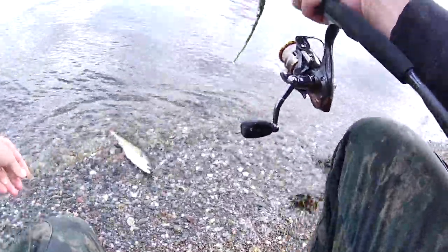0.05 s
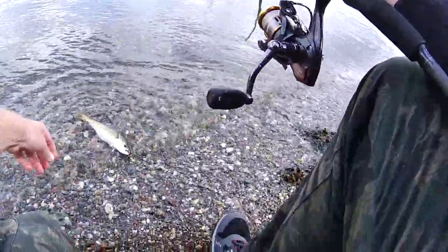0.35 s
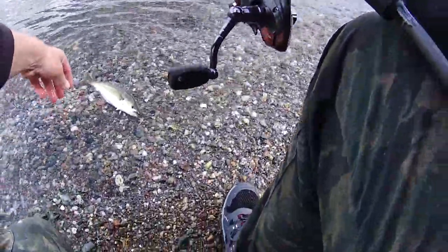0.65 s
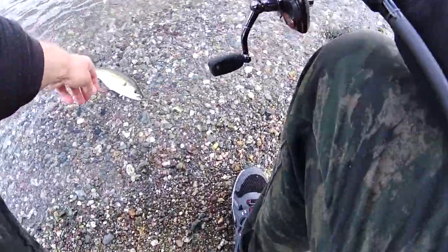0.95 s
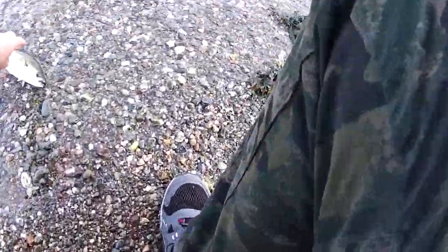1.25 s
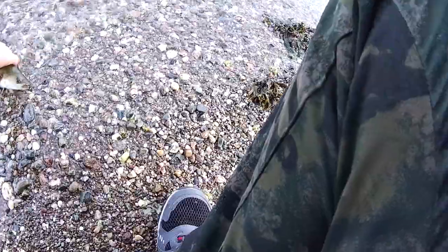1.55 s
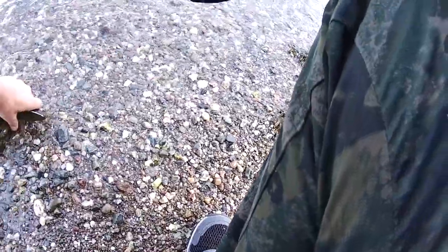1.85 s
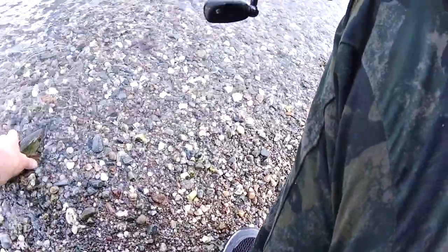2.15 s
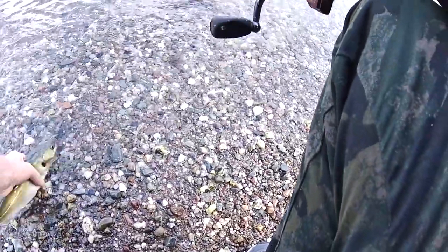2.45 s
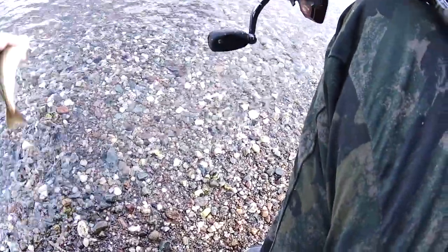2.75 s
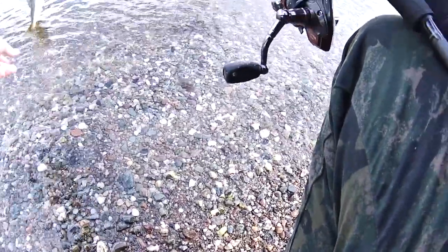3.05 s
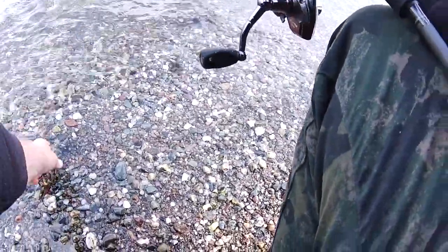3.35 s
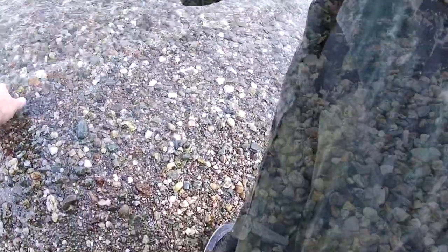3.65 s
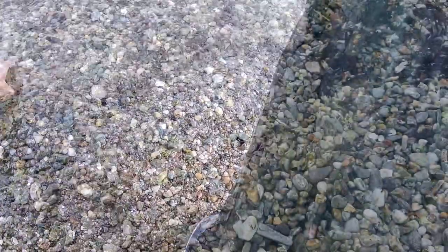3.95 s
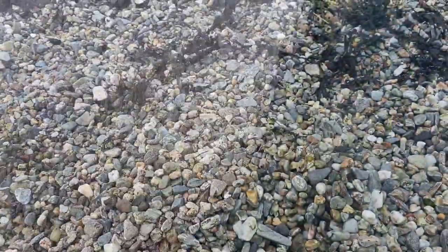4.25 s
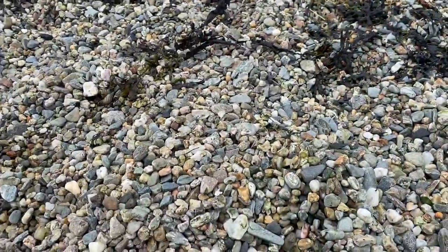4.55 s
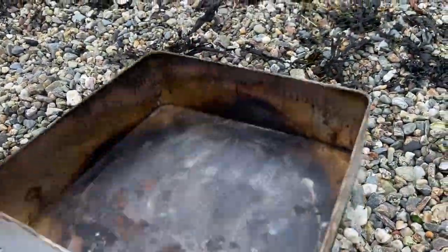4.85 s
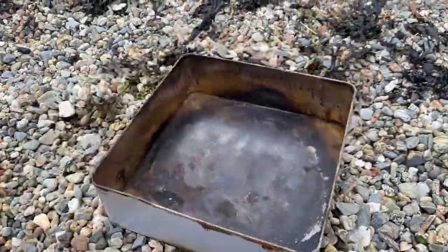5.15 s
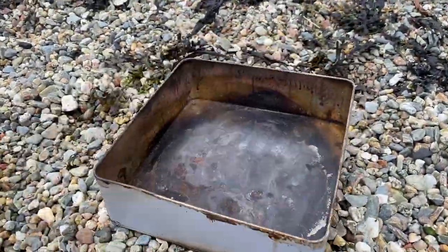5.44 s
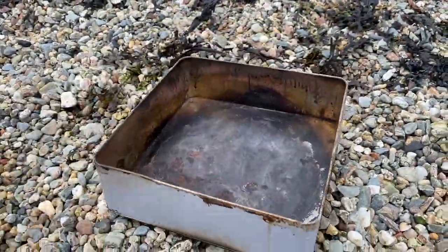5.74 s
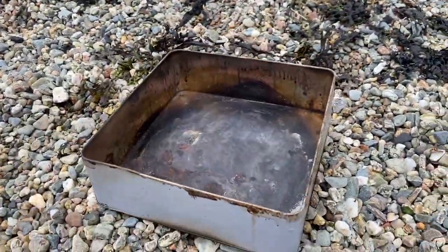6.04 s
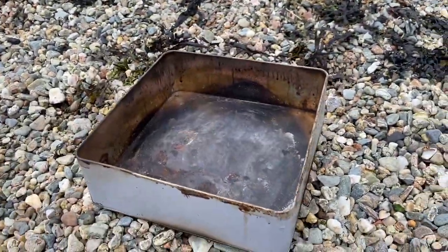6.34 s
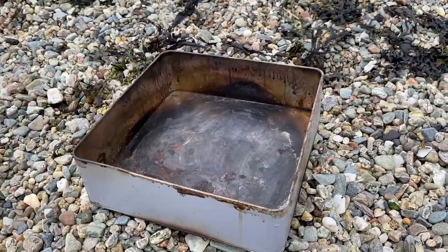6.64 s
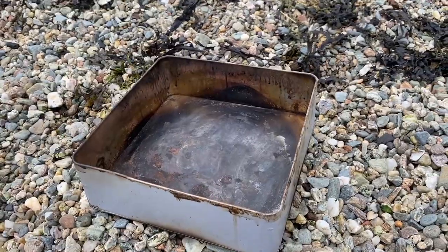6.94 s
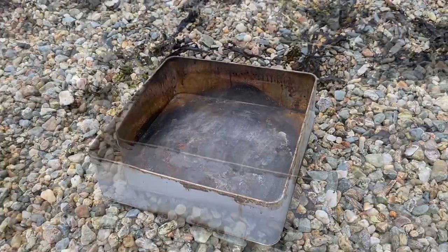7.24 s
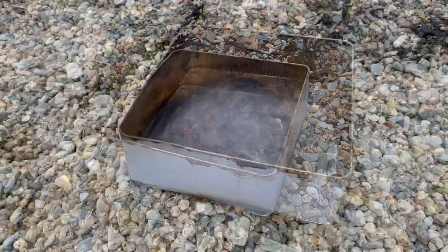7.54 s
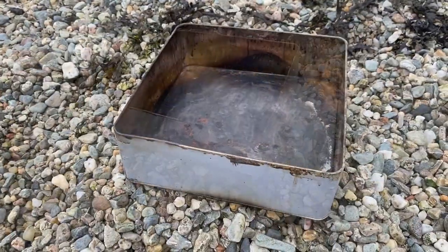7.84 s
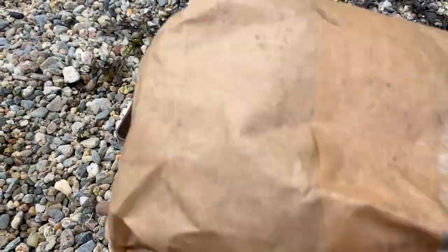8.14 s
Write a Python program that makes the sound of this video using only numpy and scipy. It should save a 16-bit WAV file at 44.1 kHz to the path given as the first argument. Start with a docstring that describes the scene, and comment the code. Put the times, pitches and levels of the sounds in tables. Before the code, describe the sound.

Close splashes and gurgles at a pebble shore, followed by a loud, ringing metal tray landing on stones and some paper rustling.

```python
"""A deep sheet-metal tray drops on dry pebbles near the microphone: it crashes, rings and rocks still.
Before that, close up at the water's edge, a sleeve swishes as a hand grabs a small fish from the
shallows; water splashes, gulps and trickles through the stones. At the end a paper bag crinkles.
The shoreline breeze gives way to a low outdoor rumble and distant lapping, heard from up the beach."""
import sys
import numpy as np
from scipy import signal
from scipy.fft import rfft, irfft, next_fast_len
from scipy.io import wavfile
from scipy.ndimage import uniform_filter1d

SR = 44100
rng = np.random.default_rng(int(sys.argv[2]) if len(sys.argv) > 2 else 0)


def bounce(signal):
    """Save signal as a 16-bit WAV file at the path given by the first command-line argument."""
    frames = np.transpose(np.atleast_2d(signal))
    limited = np.clip(frames, -1, 1)
    pcm = np.round(limited * 32767).astype(np.int16)
    wavfile.write(sys.argv[1], SR, pcm)


N = 361179
TIME = np.arange(N) / SR
SIDE = np.array([[1], [-1]])  # adds on the left, subtracts on the right


def from_db(db):
    """Decibels to gain."""
    return 10 ** (np.asarray(db) / 20)


def rms_one(x):
    """Scale to an rms of one."""
    return x / np.sqrt(np.mean(x ** 2) + 1e-20)


def at_hz(points, hz, column=1):
    """Read a table on a log-frequency axis."""
    table = np.array(points)
    return np.interp(np.log(hz + 1), np.log(table[:, 0] + 1), table[:, column])


def colour(x, spectrum):
    """Give a signal a spectrum that falls away beyond its ends; rms 1."""
    size = next_fast_len(len(x))
    hz = np.fft.rfftfreq(size, 1 / SR)
    ends = np.minimum(hz / spectrum[0][0], 1) ** 2 * np.minimum(spectrum[-1][0] / (hz + 1), 1) ** 2
    return rms_one(irfft(rfft(x, size) * from_db(at_hz(spectrum, hz)) * ends, size)[:len(x)])


def band(x, low_hz, high_hz):
    """Causal band-pass."""
    return signal.sosfilt(signal.butter(2, [low_hz, high_hz], "band", fs=SR, output="sos"), x + 1e-18)


def add(out, start_s, x):
    """Mix a sound in at a time."""
    start = int(start_s * SR)
    out[start:start + len(x)] += x[:N - start]


def grains(per_s, spread_db):
    """Random clicks, many small and a few large; rms 1."""
    sizes = from_db(spread_db * np.minimum(rng.exponential(1, N), 4)) * rng.choice([-1, 1], N)
    return rms_one(sizes * (rng.random(N) < per_s / SR))


def drift(rate_hz, step=40):
    """A slow random wander with a spread of one."""
    pole = np.exp(-2 * np.pi * rate_hz * step / SR)
    slow = signal.lfilter([1], [1, -2 * pole, pole ** 2], rng.standard_normal(N // step + 2002))[2000:]
    return np.interp(np.arange(N) / step, np.arange(len(slow)), rms_one(slow))


def swell(start, db, attack, hold, release, onset_s=.015):
    """Gain of one rub or surge: it sets in, grows, holds and dies away."""
    times = start + np.cumsum([-onset_s, onset_s, attack, hold, release, 2 * release])
    contour_db = np.interp(TIME, times[1:], [-11, 0, 0, -19, -70])
    return np.interp(TIME, times[:2], [0, 1]) * from_db(db + contour_db) * (TIME < times[-1])


def moving_water(depth_db, rate_hz, bands=14):
    """Noise whose bands swell and sink each on its own, as moving water does."""
    edges, white = np.geomspace(200, 16000, bands + 1), rng.standard_normal((2, N))
    return rms_one(sum(band(white[k % 2], edges[k], edges[k + 1]) * from_db(depth_db * drift(rate_hz))
                       for k in range(bands)))


# The air around the microphone and the far waterline. Each row: frequency in Hz, spectral level in dB.
BREEZE_SPECTRUM = [(25, -8), (60, -6.5), (115, 1), (170, -5.5), (260, -12), (450, -19), (1500, -29),
                   (5000, -46), (7000, -51), (14000, -52)]
RUMBLE_SPECTRUM = [(12, -51), (20, -21.5), (52, -6), (76, 1), (123, -8.5), (147, -8), (179, -12.5),
                   (285, -19.5), (336, -29.5), (400, -24), (520, -49.5), (880, -120)]
LAPPING_SPECTRUM = [(250, -3.5), (450, -4.5), (800, -2.5), (1300, -5.5), (2100, -2.5), (3000, -12),
                    (4200, -13.5), (7000, -26), (15000, -30)]


def open_air(breeze_db=-59, rumble_db=-57.5, lapping_db=-67.5, width=.2, crossfade_s=(3.6, 4.2)):
    """The breeze at the water's edge gives way to a low rumble and distant lapping up the beach."""
    inland = np.interp(TIME, crossfade_s, [0, 1])
    breeze = from_db(breeze_db) * colour(rng.standard_normal(N), BREEZE_SPECTRUM)
    mid, side = [colour(rng.standard_normal(N), RUMBLE_SPECTRUM) for _ in range(2)]
    rumble = from_db(rumble_db) * (mid + width * side * SIDE)
    lapping = from_db(lapping_db) * colour(moving_water(depth_db=3.2, rate_hz=7), LAPPING_SPECTRUM)
    # distant water is diffuse: each side hears a different stretch of it
    far = np.array([lapping, np.roll(lapping, N // 2)])
    return np.sqrt(1 - inland) * breeze + np.sqrt(inland) * (rumble + far)


# Water among the stones, close up. Each row: start in seconds, level in dB, attack, hold and release
# in seconds, trickle boost in dB.
SURGES = [(.225, -53, .02, .08, .08, -5), (.385, -50, .025, .06, .08, -7), (.575, -58, .02, .08, .2, 3),
          (1.03, -64, .02, .2, .1, 3), (1.935, -59.5, .015, .32, .5, 5), (2.35, -54, .08, .05, .2, -1),
          (2.69, -61, .012, .12, .05, 6), (3.12, -65.5, .03, .12, .06, 5), (3.345, -54, .006, .04, .12, 9),
          (3.43, -52.5, .015, .15, .8, 3.5)]
# Its low slosh and bright trickle. Each row: frequency in Hz, spectral level in dB.
SLOSH_SPECTRUM = [(150, 0.5), (300, 4.5), (650, 3), (1050, -3.5), (1400, -0.5), (2200, -20)]
TRICKLE_SPECTRUM = [(900, -43), (1600, 1), (2300, 3.5), (2900, -1.5), (3700, -4), (5200, -2), (6600, -22),
                    (9200, -23), (11500, -35), (15000, -32)]
SHORE_FADE_S = (3.9, 4.22)  # the scene changes: the waterline falls silent


def wash(seep_db=-68, drops_db=-4, ticks_db=-17, trickle_db=-5.5):
    """Over a steady seep, surges drain between the stones: bubbles ring and grit ticks above a slosh."""
    water = colour(moving_water(depth_db=2.8, rate_hz=14), TRICKLE_SPECTRUM)
    ticks = rms_one(band(grains(per_s=30, spread_db=3), 2200, 5000))
    fizz = water + from_db(drops_db) * droplets() + from_db(ticks_db) * ticks
    slosh_power = trickle_power = from_db(seep_db) ** 2
    for *shape, boost_db in SURGES:
        flow = swell(*shape)
        slosh_power = slosh_power + flow ** 2
        trickle_power = trickle_power + (flow * from_db(boost_db)) ** 2
    slosh = np.sqrt(slosh_power) * colour(grains(per_s=3000, spread_db=2.6), SLOSH_SPECTRUM)
    trickle = from_db(trickle_db) * np.sqrt(trickle_power) * fizz
    return np.interp(TIME, SHORE_FADE_S, [1, 0]) * (slosh + trickle)


def droplets(decay_cycles=4.5, glide=.012, spread_db=7, count=1300):
    """Tiny bubbles scattered through the running water, each a short ring rising slightly in pitch."""
    out, t = np.zeros(N), TIME[:SR // 30]
    for when, smallness, strength in rng.random((count, 3)):
        hz = 950 * 5.3 ** smallness
        age = t * hz / decay_cycles
        envelope = (1 - np.exp(-5 * age)) * np.exp(-age)
        tone = np.sin(2 * np.pi * hz * t * (1 + glide * np.minimum(age, 5)))
        gain = from_db(spread_db * min(-np.log(1 - strength), 3))
        add(out, when * SHORE_FADE_S[1], gain * envelope * tone)
    return rms_one(out)


# Single bubbles in the near shallows. Each row: start in seconds, level in dB, pitch in Hz,
# ring time in seconds.
BUBBLES = [(.305, -32, 385, .009), (.329, -36.5, 520, .008), (.376, -37, 537, .007), (.478, -33, 400, .012),
           (1.336, -20.5, 640, .004), (1.922, -44, 590, .014), (2.043, -44, 2600, .008),
           (2.071, -41, 2320, .009), (2.162, -33, 2400, .007), (2.256, -36, 2950, .006),
           (2.348, -39.5, 1500, .014), (2.914, -46, 2350, .0055), (3.358, -40, 1870, .02),
           (3.408, -39, 1710, .028), (3.486, -29, 950, .02), (3.501, -18.5, 1500, .0045),
           (3.654, -43, 885, .02), (3.662, -42, 2400, .01), (3.75, -44, 1700, .012),
           (3.91, -47.5, 1020, .012), (4.005, -53, 1900, .014), (4.315, -56, 600, .04),
           (4.36, -57, 660, .06)]
# Large air pockets, falling in pitch as they open and rising as they close. Each row: start in seconds,
# level in dB, first and last pitch in Hz, swell and ring time in seconds.
GULPS = [(1.725, -25, 352, 203, .0013, .0072), (1.917, -32, 450, 1450, .027, .007),
         (2.361, -37, 2190, 1660, .002, .016), (3.457, -25, 633, 535, .0056, .031),
         (3.459, -29, 418, 265, .011, .06), (3.503, -30.5, 248, 197, .0024, .037),
         (3.535, -37.5, 286, 364, .009, .063)]


def bubbles(wobble=.35, surfacing_rise=.17, swell_share=.2):
    """An air pocket's ring swells and dies away, gliding in pitch as it changes size and depth."""
    out, unrest = np.zeros(N), rms_one(band(rng.standard_normal(N), 27, 234))
    surfacing = [(start, db, hz, hz * (1 + surfacing_rise), swell_share * fade, fade)
                 for start, db, hz, fade in BUBBLES]
    for start, db, first_hz, last_hz, rise, fade in surfacing + GULPS:
        t = TIME[:int((rise + 2 * fade) * SR)]
        hz = np.interp(t, [0, rise + fade], [first_hz, last_hz])
        envelope = np.minimum(t / rise, 1) ** 2 * np.exp(-2.6 * np.maximum(t - rise, 0) / fade)
        envelope *= 1 + wobble * unrest[int(start * SR):][:len(t)]
        add(out, start, from_db(db) * envelope * np.sin(2 * np.pi * np.cumsum(hz) / SR))
    return out


# Sleeve and hand over wet gravel, close to the microphone. Each row: start in seconds, level in dB,
# attack, hold and release in seconds, name of the spectrum.
SLEEVE_STROKES = [(.425, -38.5, .08, .05, .025, "dip"), (.745, -45.5, .06, .2, .12, "reach"),
                  (1.27, -39.5, .08, .15, .12, "grab"), (1.555, -36.5, .05, .035, .1, "grab")]
# The tone of the dip, the reach and the grab. Each row: frequency in Hz, spectral level in dB.
STROKE_SPECTRA = {"dip": [(120, -38), (200, -12), (301, -6.5), (379, -5), (486, -4), (890, -15),
                  (1030, -24), (1690, -10.5), (2130, -9.5), (2450, -18.5), (5650, -20), (6640, -41),
                  (9470, -34), (14000, -66)], "reach": [(120, -37), (200, -11.5), (445, -4.5), (513, -8),
                  (800, -1), (1030, -10.5), (1200, -3.5), (1490, -1), (1850, -8), (2280, -6), (3380, -16.5),
                  (4650, -14.5), (6750, -33.5), (14000, -48)], "grab": [(120, -60), (200, -12.5), (318, -7),
                  (393, -7.5), (453, 1.5), (495, -5.5), (694, -2.5), (939, -6.5), (1600, -5), (2730, -16),
                  (4820, -20.5), (6520, -37), (8510, -41.5), (14000, -58)]}


def sleeve_strokes():
    """Cloth and wet grit catch and slip thousands of times a second, pressing unevenly."""
    friction = grains(per_s=4500, spread_db=3.2) * from_db(1.6 * drift(rate_hz=70))
    return sum(swell(*shape) * colour(friction, STROKE_SPECTRA[name]) for *shape, name in SLEEVE_STROKES)


# Larger stones at the waterline. Each row: start in seconds, peak level in dB, pitch in Hz.
STONE_CLICKS = [(.631, -42.5, 4670), (.758, -36, 2600), (1.923, -42, 3270), (2.06, -33, 4700),
                (2.086, -32, 3000), (2.349, -37, 3500), (2.698, -38, 4460), (3.352, -36, 4080),
                (3.67, -40, 3800), (3.72, -39.5, 3680), (3.817, -35.5, 4650)]


def stone_clicks(decay_s=.00061):
    """Two pebbles touch: a dry tick about an octave wide."""
    out, t = np.zeros(N), TIME[:SR // 50]
    for start, db, hz in STONE_CLICKS:
        tick = band(rng.standard_normal(len(t)) * np.exp(-t / decay_s), hz / 1.53, hz * 1.17)
        add(out, start, from_db(db) * tick / np.abs(tick).max())
    return out


def showers(rows, body_spectrum, top_spectrum, per_s, steepness):
    """Short showers of tiny impacts, each with a dull body and a bright top."""
    out = np.zeros(N)
    body = colour(grains(per_s, spread_db=.88), body_spectrum)
    top = colour(grains(per_s, spread_db=1.4), top_spectrum)
    for start, db, rise, length, top_db in rows:
        t = TIME[:int(4 * length * SR)]
        span = slice(int(start * SR), int(start * SR) + len(t))
        envelope = np.minimum(t / rise, 1) / (1 + (t / length) ** steepness)
        add(out, start, from_db(db) * envelope * (body[span] + from_db(top_db) * top[span]))
    return out


# Splashes straight ahead of the microphone. Each row: start in seconds, level in dB, rise and length
# in seconds, relative spray level in dB.
SPLASHES = [(1.252, -28.5, .01, .032, -7), (1.714, -37.5, .004, .014, -13), (2.056, -57, .002, .04, 13),
            (2.13, -58.5, .012, .05, 17.5), (3.402, -40, .002, .017, -5), (3.457, -38, .0014, .033, -4),
            (3.497, -31.5, .0017, .0097, 3.5)]
# The body of a splash. Each row: frequency in Hz, spectral level in dB.
SPLASH_SPECTRUM = [(100, -20), (400, 2.5), (750, 3.5), (1050, -4.5), (1450, 5.5), (2100, -17.5),
                   (3500, -15.5)]


def splashes():
    """Hand and fish strike the water and throw up a bright spray."""
    return showers(SPLASHES, SPLASH_SPECTRUM, TRICKLE_SPECTRUM, per_s=6000, steepness=4.8)


# Dry pebbles nearby, up the beach. Each row: start in seconds, level in dB, rise and length in seconds,
# relative grit level in dB.
PEBBLE_SHIFTS = [(4.48, -59.5, 0.022, .09, -9), (4.618, -70, 0.0048, .03, 17),
                 (4.84, -66.5, 0.01, 0.21, -10), (4.945, -54.5, 0.022, .05, -9),
                 (5.01, -60.5, 0.06, 0.18, -8)]
# The pebbles and their grit. Each row: frequency in Hz, spectral level in dB.
PEBBLE_SPECTRUM = [(300, -11), (650, 1), (850, -2), (1150, 1.5), (1700, -5), (2500, -7), (5000, -10.5)]
GRIT_SPECTRUM = [(1500, -16.5), (3800, 2.5), (7000, -4.5), (15500, 5)]


def shifting_pebbles():
    """Dry stones shift against each other in a crunch of tiny contacts."""
    return showers(PEBBLE_SHIFTS, PEBBLE_SPECTRUM, GRIT_SPECTRUM, per_s=4200, steepness=3.5)


# The tray's rim hits the stones near the microphone. One row: start in seconds, level in dB,
# treble in dB, crunch length in seconds.
RIM_LANDING = (5.086, -23.5, 15.2, .0028)
# It rocks and grinds itself still. Each row: start in seconds, level in dB, crunch length in seconds.
TRAY_ROCKS = [(5.236, -27.5, .027), (5.31, -30, .033), (5.411, -36.5, .0043), (5.438, -41, .012),
              (5.522, -38, .005), (5.637, -39.5, .004), (5.715, -45, .013), (5.825, -48.5, .02),
              (5.902, -47.5, .0025), (6.011, -52.5, .015), (6.158, -56, .03)]


def tray_blows(slap_delay_s=.0065, slap_gap_s=.006, slap_db=-17.2, loss_db=5, slap_treble_db=-22):
    """The rim lands, the floor slaps down in a fast, dull, dying run, then the tray rocks."""
    first_slap = RIM_LANDING[0] + slap_delay_s
    slaps = [(first_slap + k * slap_gap_s, slap_db - k * loss_db, slap_treble_db, .003) for k in range(4)]
    # a short knock is bright, a long grind dull: 1.7 dB less treble per doubling of length
    rocks = [(start, db, -5.5 - 1.7 * np.log2(length / .01), length) for start, db, length in TRAY_ROCKS]
    return [RIM_LANDING] + slaps + rocks


def crunch(length_s, contacts_per_s=1500):
    """A dying volley of stone contacts whose force is spread evenly over all pitches; energy 1."""
    t = TIME[:SR // 3]
    contacts = rng.standard_normal(len(t)) * (rng.random(len(t)) < contacts_per_s / SR)
    contacts[0] = 1.5
    # a long grind builds up gradually, a short knock starts at once
    contacts *= np.minimum((t + .002) / (.6 * length_s), 1) * np.exp(-t / length_s)
    spectrum = rfft(contacts)
    smooth_power = uniform_filter1d(np.abs(spectrum) ** 2, size=40)
    even = irfft(spectrum / np.sqrt(smooth_power + 1e-12))[:len(t) // 2]
    return even / np.linalg.norm(even)


# The weaker modes of the tray lying on the beach. Each row: frequency in Hz, spectral level in dB,
# seconds to fall 60 dB.
PLATE_BANDS = [(50, -17, .15), (110, -9, .18), (200, -12.5, 0.72), (330, -2.5, 0.1), (506.4, -0.5, 0.4),
               (756, -1.5, .4), (1040, -0.5, 0.32), (1490, -4.5, .36), (2233, -9.5, .3), (3400, -11, 0.3),
               (4420, -12, 0.21), (7000, -11.5, 0.16), (10800, -18, 0.17), (16000, -18.5, 0.3)]


def plate_ring(wall_db=-21.5, wall_t60=1.1, wall_top_hz=2200, bands=24):
    """Crowded plate modes: the floor of the tray is damped by the stones, the free walls ring on."""
    t, out = TIME[:2 * SR], 0
    edges = np.geomspace(45, 17000, bands + 1)
    for low, high in zip(edges, edges[1:]):
        hz = np.sqrt(low * high)
        floor = from_db(-60 * t / at_hz(PLATE_BANDS, hz, column=2))
        walls = from_db(wall_db - 60 * t / wall_t60) / np.hypot(1, hz / wall_top_hz)
        ring = band(rng.standard_normal(len(t)) * (floor + walls), low, high)
        out = out + from_db(at_hz(PLATE_BANDS, hz)) * ring
    return out / np.std(out[:SR // 50])


# The strongest modes of the sheet metal, heard close. Each row: frequency in Hz, relative level in dB,
# seconds to fall 60 dB.
TRAY_MODES = [(316, -7.5, 1), (521, -11.5, 1), (620, -8, 0.37), (689, -10.5, .6), (765, -9, 1.0),
              (930, -9.5, 0.31), (973, -6.5, 0.46), (985, 0, 0.2), (1058, -6, 0.18), (1113, -3, 0.67),
              (1123.6, -3, 0.26), (1241, -2, .4), (1330, -6, 0.61), (1396, -5.5, 0.21), (1903, -7.5, .6),
              (2138, -11, 0.59), (2752, -10, .35), (3190, -10.5, .55), (4300, -16, 0.39), (5507, -16, .35),
              (10630, -19.5, .3)]


def tray(split_hz=2200, modes_db=-13, crack_db=11, side_db=-10, thud_db=-26.5, thud_hz=115, thud_s=.025):
    """Each landing is a brief crunch of stone contacts that crack and set the sheet metal ringing."""
    resting_points = 3  # the tray rocks between them, and each excites the plate differently
    forces, t = np.zeros((resting_points, N)), TIME[:2 * SR]
    pole = np.exp(-2 * np.pi * split_hz / SR)
    for k, (start, db, treble_db, length_s) in enumerate(tray_blows()):
        contacts = crunch(length_s)
        dull = signal.lfilter([1 - pole], [1, -pole], contacts)
        blow = dull + from_db(treble_db) * (contacts - dull)
        add(forces[k % resting_points], start, from_db(db) * blow)
    modes = sum(from_db(db + modes_db - 60 * t / t60) * np.sin(2 * np.pi * (hz * t + rng.random()))
                for hz, db, t60 in TRAY_MODES)
    rings = np.array([plate_ring() for _ in range(resting_points)])
    direct = signal.fftconvolve(forces, rings + modes, axes=1).sum(axis=0)[:N]
    direct += from_db(crack_db) * band(forces.sum(axis=0), 300, 15000)
    # the weight of the tray thuds into the gravel
    add(direct, RIM_LANDING[0], from_db(thud_db) * np.exp(-t / thud_s) * np.sin(2 * np.pi * thud_hz * t))
    # the walls radiate differently to either side
    walls = signal.fftconvolve(forces, np.roll(rings, 1, axis=0), axes=1).sum(axis=0)[:N]
    return direct + from_db(side_db) * band(walls, 100, 6500) * SIDE


# The bag's panels buckle nearby, a little right of the microphone. Each row: start in seconds,
# level in dB, pitch in Hz, relative crack level in dB.
BAG_SNAPS = [(7.562, -32.5, 520, -12), (7.563, -33, 900, -10), (7.672, -40, 2530, -9.5),
             (7.719, -38, 805, -9), (7.754, -33, 533, -12), (7.758, -27.5, 1850, -18),
             (7.768, -28, 1500, -9), (7.837, -23.5, 1250, -5), (7.882, -34.5, 850, -10),
             (7.92, -28.5, 1170, -14), (7.944, -44.5, 1500, 6.5), (8.042, -38, 1600, 3),
             (8.079, -37, 450, -6), (8.143, -32.5, 676, -26), (8.18, -28, 900, -6.5)]
# Handfuls of it rustle. Each row: start in seconds, level in dB, attack, hold and release in seconds.
BAG_RUSTLES = [(7.712, -53, .012, .44, .3), (7.742, -44, .015, .085, .04), (7.878, -46, .01, .035, .12),
               (8.07, -52, .012, .025, .06)]
# The tone of the rustle. Each row: frequency in Hz, spectral level in dB.
PAPER_SPECTRUM = [(88, -39), (150, -16), (406, 1.5), (702, -4.5), (1120, -7), (2980, -13.5), (7180, -22),
                  (8900, -24), (10200, -22), (16000, -27)]


def paper_bag(rustle_db=-2, pop_cycles=2.2, crack_s=.0023, left_db=-1.8):
    """Small creases give a crackling rustle; a buckling panel gives a crack and a hollow pop."""
    creases = grains(per_s=1100, spread_db=5) + .5 * rng.standard_normal(N)
    handling = np.max([swell(*row) for row in BAG_RUSTLES], axis=0)
    out = from_db(rustle_db) * handling * colour(creases, PAPER_SPECTRUM)
    t = TIME[:SR // 25]
    for start, db, hz, crack_db in BAG_SNAPS:
        pop = np.sin(2 * np.pi * hz * t) * np.exp(-t * hz / pop_cycles)
        crack = band(rng.standard_normal(len(t)) * np.exp(-t / crack_s), 300, 5200)
        add(out, start, from_db(db) * (.8 * pop + from_db(crack_db) * crack))
    return out * from_db(left_db * SIDE)


# The microphone's two ports. Each row: frequency in Hz, lead of the left in radians,
# left minus right level in dB.
MIC_PORTS = [(0, 0, -1), (300, 0, 0), (700, .1, 2), (1300, .3, 2), (2100, .6, 0), (3000, 1.8, 0),
             (4200, .4, .5), (6800, .2, .5), (9000, -3.1, 0), (16000, -13.1, 0)]


def microphone_ports(pair):
    """Near sounds reach the two ports with a phase and level gap that depends on frequency."""
    size = next_fast_len(N + SR // 10)
    hz, *columns = np.transpose(MIC_PORTS)
    phase, balance_db = [np.interp(np.fft.rfftfreq(size, 1 / SR), hz, column) for column in columns]
    response = np.exp(1j * phase * SIDE / 2) * from_db(balance_db * SIDE / 2)
    return irfft(rfft(pair, size) * response, size)[:, :N]


def scene(wet_top_hz=10500):
    """The water's edge sounds soft-topped and dead centre; tray, pebbles and bag lie wider."""
    shallows = sleeve_strokes() + wash() + bubbles() + stone_clicks() + splashes()
    shallows = signal.sosfilt(signal.butter(2, wet_top_hz, fs=SR, output="sos"), shallows)
    beach = tray() + paper_bag() + shifting_pebbles()
    return shallows + microphone_ports(beach) + open_air()


def record(dry):
    """The highest peaks are rounded and the top is cut at 16 kHz."""
    rounded = 1.42 * np.tanh(dry / 1.257)
    return signal.sosfilt(signal.ellip(10, .1, 80, 16000, fs=SR, output="sos"), rounded)


dry = scene()
out = record(dry)
bounce(out)
```